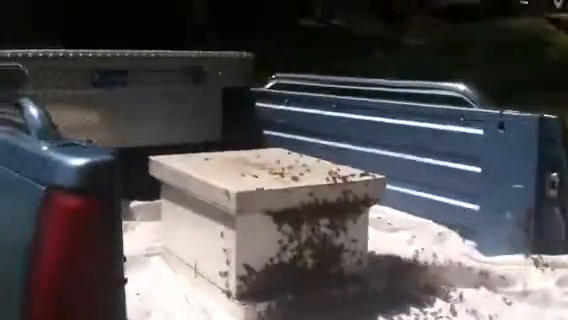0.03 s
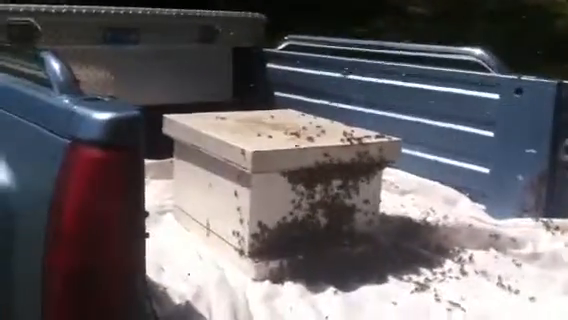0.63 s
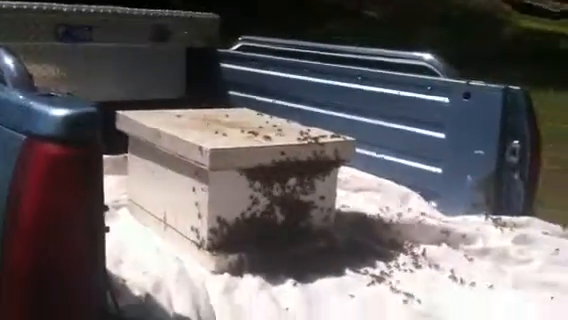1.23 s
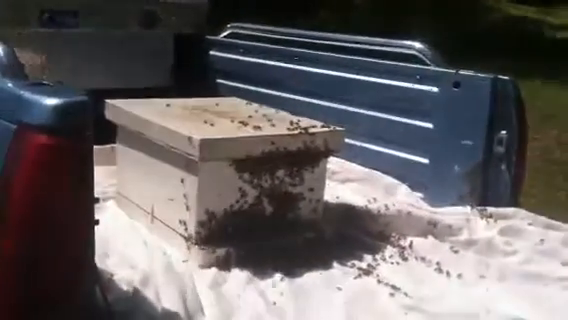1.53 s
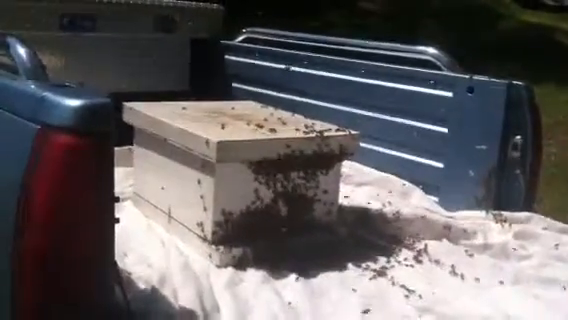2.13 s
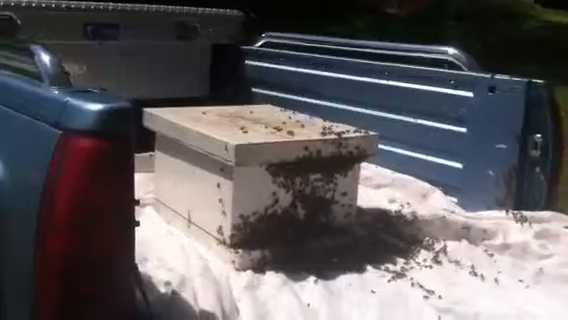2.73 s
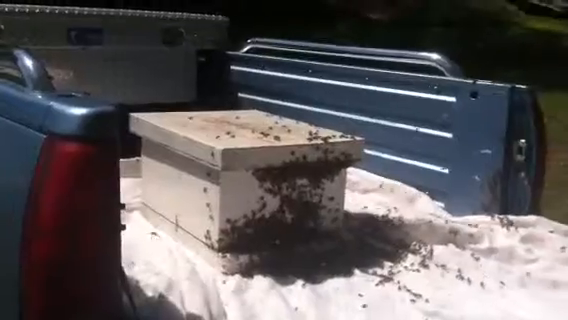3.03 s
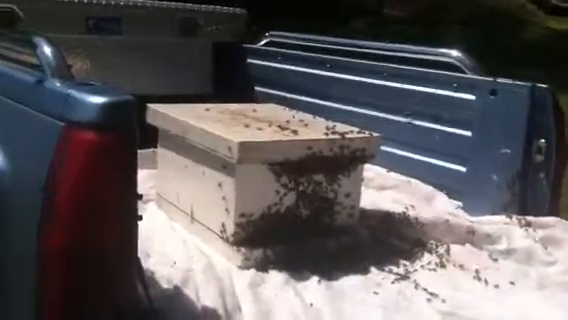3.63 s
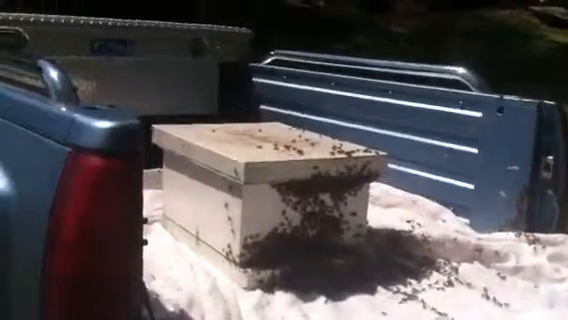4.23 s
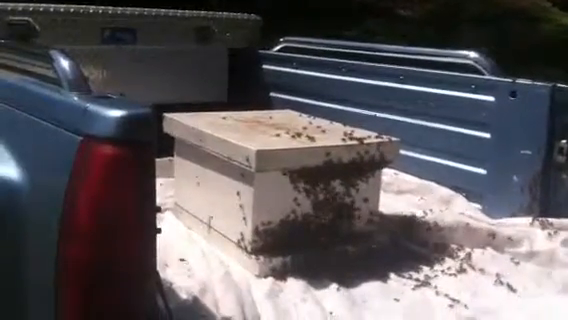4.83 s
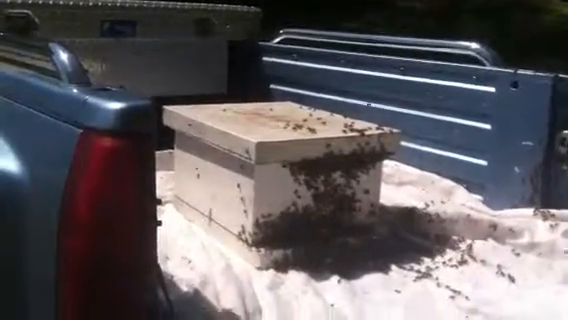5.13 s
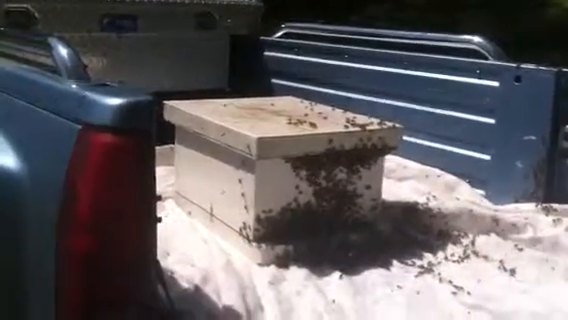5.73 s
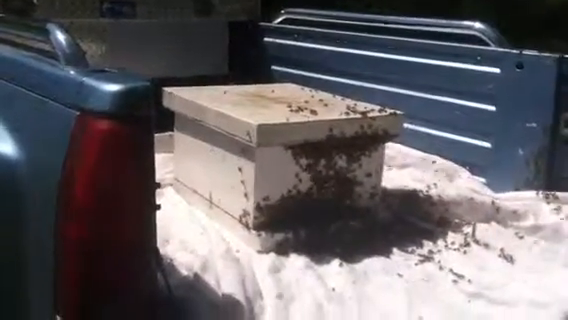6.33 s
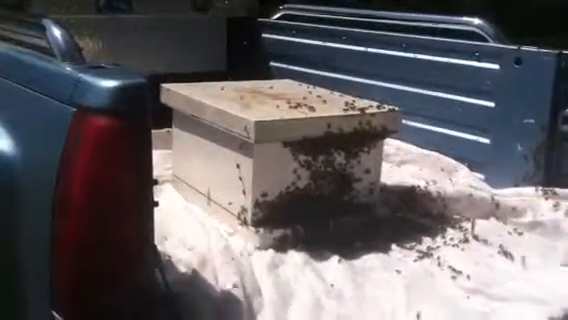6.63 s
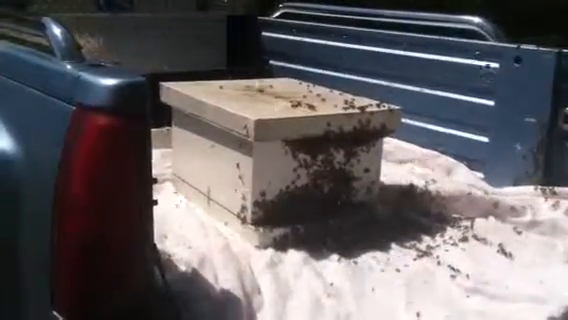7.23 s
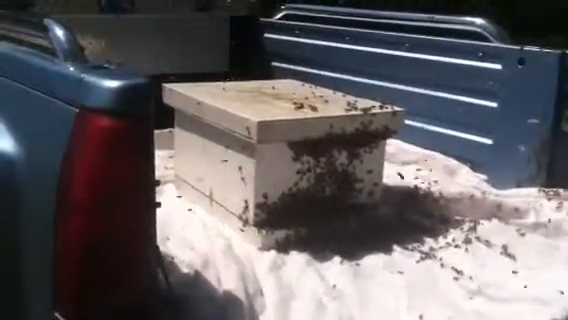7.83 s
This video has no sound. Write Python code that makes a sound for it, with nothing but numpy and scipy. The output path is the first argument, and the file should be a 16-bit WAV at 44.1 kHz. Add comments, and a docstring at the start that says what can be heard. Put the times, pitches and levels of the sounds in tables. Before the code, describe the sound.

Honeybees hum softly outdoors while fingers click and bump on the microphone, with a faint bird whistling far off.

```python
"""A swarm of honeybees settles on a hive box in the bed of a pickup, outdoors: many wingbeats merge
into one hum, and now and then a single bee passes close to the microphone.
Right at the microphone, fingers tap, bump and slide on the hand-held camera, most of all at the start.
Far off a bird repeats a falling whistle and others peep, over a low drone and soft open air."""
import sys
import numpy as np
from scipy import signal
from scipy.fft import rfft, irfft, next_fast_len
from scipy.io import wavfile
from scipy.ndimage import map_coordinates

SR = 44100
rng = np.random.default_rng(int(sys.argv[2]) if len(sys.argv) > 2 else 0)


def output_pcm(signal):
    """Save a mono or channel-first signal as 16-bit PCM at the path in sys.argv[1].

    Samples are clipped to [-1, 1] before scaling.
    """
    pcm = np.clip(np.atleast_2d(signal).T, -1, 1) * 32767
    wavfile.write(sys.argv[1], SR, np.round(pcm).astype(np.int16))


N = 357210
TIME_S = np.arange(N) / SR


def amp(db):
    """Decibels to gain."""
    return 10 ** (np.asarray(db) / 20)


def unit(x):
    """Scale to rms 1."""
    return x / np.sqrt(np.mean(x ** 2) + 1e-20)


def wobble(knots_per_s):
    """A smooth random curve, about 1 rms."""
    coarse = np.arange(0, N + 64, 64)
    knots = rng.standard_normal(int(N * knots_per_s / SR) + 4)
    return np.interp(np.arange(N), coarse, map_coordinates(knots, [coarse * knots_per_s / SR]))


def swell(t, middle_s, half_s):
    """A smooth bell of height 1."""
    return np.exp(-((t - middle_s) / half_s) ** 2)


def cycles(hz):
    """Cycles completed at a moving frequency."""
    return np.cumsum(hz) / SR


def filtered(x, gain_at_hz):
    """Filter x by a gain that depends on frequency."""
    size = next_fast_len(N + 8192)
    return irfft(rfft(x, size) * gain_at_hz(np.fft.rfftfreq(size, 1 / SR)), size)[:N]


def coloured(x, spectrum):
    """Shape x by (frequency_hz, level_db) points, at rms 1."""
    points_hz, db = np.transpose(spectrum)
    return unit(filtered(x, lambda hz: amp(np.interp(np.log(hz + 1), np.log(points_hz), db))))


def add(out, start_s, sound):
    """Mix a sound in at a time."""
    out[round(start_s * SR):][:len(sound)] += sound


# Open air and the microphone's own hiss: frequency_hz, level_db
AIR_SPECTRUM = [(25, -19), (70, -23), (125, 0), (155, 0), (210, 3.5), (600, -1.5), (1300, -1.5),
                (1700, -10.5), (3200, -18), (4400, -16), (5600, -23.5), (8000, -18), (10200, -26.5),
                (15500, -34.5)]

def open_air(level_db=-61):
    """Soft air and hiss all around, drifting slightly in level."""
    return amp(level_db + 0.6 * wobble(3.06)) * coloured(rng.standard_normal(N), AIR_SPECTRUM)


# Tones of a drone in the distance: pitch_hz, relative_db
DRONE_TONES = [(102, -5), (123, -5.5)]
# Its rise and fall: time_s, level_db
DRONE_LEVELS = [(0.7, -75), (4.7, -70), (5.67, -72.5), (7.42, -74.5), (8.1, -63)]

def far_drone():
    """Two low tones far off, each a little unsteady in level and pitch."""
    drone = np.zeros(N)
    for hz, db in DRONE_TONES:
        gain = amp(db + 1.8 * wobble(8.5))
        drone += gain * unit(np.sin(2 * np.pi * cycles(hz + 3.547 * wobble(13))))
    return drone * amp(np.interp(TIME_S, *np.transpose(DRONE_LEVELS)))


def whistle(t, hold_s, pitch_hz, attack_s=0.017, release_s=0.088):
    """One quavering note: it sags while held, then drops to a lower tone as it fades."""
    envelope = np.clip(np.minimum(t / attack_s, 1 - (t - hold_s) / release_s), 0, 1)
    sag_hz = 248 * t
    drop_hz = np.clip(8000 * (t - hold_s), 0, 221)
    quaver = 1 + 0.01 * wobble(140)[:len(t)]
    tremble = amp(2.5 * wobble(45)[:len(t)])
    return envelope * tremble * np.sin(2 * np.pi * cycles((pitch_hz - sag_hz - drop_hz) * quaver))


def through_trees(call, echo_db, t60_s=0.85):
    """A call reaches the microphone directly and as a fading wash of echoes from the trees."""
    t = TIME_S[:len(call)]
    paths = rng.standard_normal(len(t)) * amp(-60 * t / t60_s)
    paths *= amp(echo_db) / np.linalg.norm(paths)
    paths[0] += 1  # the direct path
    return signal.fftconvolve(call, paths / np.linalg.norm(paths))


# One bird whistling far off: start_s, hold_s, pitch_hz, level_db
WHISTLE_NOTES = [(1.44, 0.06, 2765, -68), (1.616, 0.078, 2763, -64), (1.836, 0.062, 2760, -64.5),
                 (2.038, 0.079, 2730, -64.5), (2.228, 0.097, 2725, -65.5), (2.434, 0.091, 2710, -66),
                 (5.105, 0.07, 2765, -66.5), (5.305, 0.075, 2755, -67), (5.502, 0.065, 2750, -67),
                 (5.73, 0.1, 2730, -65)]
# Thin peeps of other birds: middle_s, pitch_hz, level_db
BIRD_PEEPS = [(2.01, 3620, -76), (2.08, 3640, -77), (2.16, 3650, -78), (6.26, 4265, -76), (6.33, 4245, -75),
              (6.425, 4250, -75), (6.885, 3582, -77), (6.98, 3610, -78), (7.095, 3610, -74)]

def far_birds(peep_half_s=0.024):
    """Distant runs of whistles, blurred by the trees, and drier peeps."""
    t = TIME_S[:SR // 2]
    out = np.zeros(N + SR)
    notes = [(start_s, db, whistle(t, hold_s, hz)) for start_s, hold_s, hz, db in WHISTLE_NOTES]
    for start_s, db, note in notes:
        add(out, start_s, amp(db) * through_trees(note, echo_db=1.5))
    lead_s = 2 * peep_half_s
    for middle_s, hz, db in BIRD_PEEPS:
        peep = swell(t, lead_s, peep_half_s) * np.sin(2 * np.pi * hz * t)
        add(out, middle_s - lead_s, amp(db) * through_trees(peep, echo_db=-3))
    return out[:N]


# Skin rubbing on plastic: frequency_hz, level_db
SKIN_SPECTRUM = [(60, -38), (150, -5.5), (700, -5), (1200, -3.5), (1600, 1.5), (2400, -2), (4500, -8.5),
                 (5500, -12), (8500, -11.5), (11000, -21), (15500, -27)]
# Fingers shifting on the camera: middle_s, half_length_s, level_db, tilt_db_per_octave
FINGER_SLIDES = [(0.006, 0.015, -40, -5), (0.076, 0.018, -42.5, -5), (0.236, 0.068, -49.5, -4),
                 (0.38, 0.17, -56.5, -2.5), (.72, 0.71, -65.5, -2), (2.934, 0.22, -60.5, -2),
                 (3.36, 0.085, -59, -3), (3.826, 0.56, -65.5, -3.5)]

def finger_slides():
    """Skin rubs over the case in grainy swells, each with its own brightness."""
    out = np.zeros(N)
    for middle_s, half_s, db, tilt in FINGER_SLIDES:
        grain = rng.standard_normal(N) * amp(1.5 * wobble(250))
        rub = coloured(grain, [(hz, level + tilt * np.log2(hz)) for hz, level in SKIN_SPECTRUM])
        out += amp(db) * swell(TIME_S, middle_s, half_s) * rub
    return out


# A nail scraping on plastic: frequency_hz, level_db
NAIL_SPECTRUM = [(60, -18), (220, -2), (800, -0.5), (1100, -5), (1600, 5.5), (2200, -2), (2850, -10),
                 (3700, -5.5), (4200, -8.5), (4700, -6), (5500, -14.5), (7400, -11), (9500, -21),
                 (12000, -27.5), (15500, -37.5)]
# Quick scrapes right by the microphone: middle_s, half_length_s, level_db
NAIL_SCRAPES = [(0.481, 0.01, -41.5), (3.298, 0.032, -47.5)]

def nail_scrapes(slips_per_s=7000):
    """A nail skids over the case: tiny irregular slips excite its resonances."""
    out = np.zeros(N)
    for middle_s, half_s, db in NAIL_SCRAPES:
        slips = (rng.random(N) < slips_per_s / SR) * rng.standard_normal(N)
        out += amp(db) * swell(TIME_S, middle_s, half_s) * coloured(slips, NAIL_SPECTRUM)
    return out


# Resonances of the plastic case around the microphone: frequency_hz, width_hz, gain_db
CASE_MODES = [(483, 180, 3.5), (1090, 430, 1), (1974, 320, -9), (3180, 2700, -8)]

def knock(pitch_hz, q, low_cut_hz=95, size=2048):
    """A well damped blow that rings the case, as the small microphone hears it; peak 1."""
    f = np.fft.rfftfreq(size, 1 / SR)
    s, u = 1j * f / pitch_hz, 1j * f / low_cut_hz
    resonance = s / (1 + s / q + s * s)
    treble_cut = 1 / (1 + s / 1.28 + (s / 2.0) ** 2) / (1 + s / 2.2 + (s / 2.9) ** 2)
    case = 1 + sum(amp(db) * 1j * f * width / (hz * hz - f * f + 1j * f * width)
                   for hz, width, db in CASE_MODES)
    low_cut = (u * u / (1 + np.sqrt(2) * u + u * u)) ** 2
    ring = irfft(resonance * treble_cut * case * low_cut, size)[:size // 2]
    return ring / np.abs(ring).max()


# Fingertips landing on the camera: start_s, peak_db, pitch_hz
FINGER_BUMPS = [(0.0234, -19, 378), (0.0487, -23.5, 428), (0.067, -23.5, 362), (0.0853, -23, 255),
                (0.0888, -23, 234), (0.5816, -38.5, 150), (1.286, -39, 308), (1.4171, -35.5, 480),
                (1.4737, -39.5, 189), (2.1, -34, 240), (2.2929, -36, 278), (2.625, -40.5, 380),
                (2.6835, -29.5, 260), (3.282, -41, 240), (3.352, -44, 258), (4.577, -36.5, 290)]

def finger_bumps():
    """Flesh gives the case one round, dull push."""
    out = np.zeros(N + SR)
    for start_s, db, pitch_hz in FINGER_BUMPS:
        add(out, start_s, amp(db) * knock(pitch_hz, q=1.47))
    return out[:N]


# A nail tapping right by the microphone: start_s, level_db, pitch_hz, ring_q, jolt_relative_db
NAIL_CLICKS = [(0.0062, -27, 1500, 2, -20), (0.0092, -19.5, 2300, 0.96, -20), (0.0147, -9, 2900, 1.1, -25),
               (0.0144, -15, 10000, 1.7, -30), (0.0157, -18.5, 1200, 1.3, -20),
               (0.048, -16.5, 1190, 1.8, -13.5), (0.0675, -24.5, 1000, 0.89, -13),
               (0.0824, -34.5, 2400, 0.78, -12), (0.1103, -25, 1980, 3.0, -17),
               (0.152, -29.5, 1170, 1, -10.5), (0.188, -29.5, 1500, 0.86, -14),
               (0.207, -29.5, 1300, 1, -10), (0.579, -35, 1460, 1.5, -13), (0.5808, -26.5, 1580, 0.97, -12),
               (0.9609, -23, 1930, 1.3, -14), (0.9987, -37.5, 1600, 1.5, -15),
               (1.0018, -40, 1270, 1.8, -19.5), (1.04, -42, 8600, 0.95, -25), (1.0636, -43.5, 1600, 1, -10),
               (1.4169, -34, 2330, 3.9, -20), (2.6388, -35, 1500, 0.79, -12),
               (2.6847, -36.5, 1930, 0.71, -17.5), (2.6948, -42.5, 7640, 1, -25),
               (2.7053, -40, 7040, 1, -24.5), (3.3523, -42.5, 1700, 1.2, -16),
               (3.4137, -37.5, 1260, 0.89, -15), (3.4185, -38, 9000, 1, -19), (3.4232, -42, 4500, 1, -21.5),
               (4.2795, -52, 4200, 0.8, -25), (4.593, -49.5, 2900, 0.9, -20),
               (4.6203, -42, 7500, 0.72, -25)]

def nail_clicks(snap_db=-22, chatter_db=-11, chatter_t60_s=0.01):
    """Each click snaps, rings at its own pitch and jolts the camera, whose loose parts chatter."""
    out = np.zeros(N + SR)
    jolt, snap = knock(pitch_hz=253, q=0.78), knock(pitch_hz=8800, q=2.8)
    t = TIME_S[:len(jolt)]
    lowpass = signal.butter(1, 5000, fs=SR)
    for start_s, db, pitch_hz, q, jolt_db in NAIL_CLICKS:
        ring = knock(pitch_hz, q)
        rattle = signal.lfilter(*lowpass, rng.standard_normal(len(t)) * amp(-60 * t / chatter_t60_s))
        chatter = signal.fftconvolve(ring, rattle / np.linalg.norm(rattle))[:len(t)]
        click = ring + amp(snap_db) * snap + amp(chatter_db) * chatter + amp(jolt_db) * jolt
        add(out, start_s, amp(db) * click)
    return out[:N]


def bee(beat_hz, wander, flutter, swing_db, harmonics=30, size=2048):
    """One bee: a wing stroke rich in overtones repeats at a wandering rate, louder as it comes near."""
    stroke = irfft(np.r_[0, np.exp(2j * np.pi * rng.random(harmonics))], size)
    rate_hz = beat_hz * np.exp(wander * wobble(2.5) + flutter * wobble(16))
    wave = np.interp(cycles(rate_hz) % 1 * size, np.arange(size), stroke)
    return unit(wave) * amp(swing_db * np.tanh(wobble(2.948) / 2))


# Wingbeats at the microphone, for single bees and the swarm: frequency_hz, level_db
WING_SPECTRUM = [(110, -32), (170, -1), (245, 3), (300, 1.5), (380, 4), (510, -1.5), (600, -3), (820, -6),
                 (1000, -4), (1380, -5.5), (1550, -17.5), (2600, -14.5), (3200, -31.5), (8000, -22.5)]
# Single bees close to the microphone: middle_s, half_length_s, wingbeat_hz, level_db
BEE_FLYBYS = [(1.64, 0.14, 250.4, -63), (4.33, 0.1, 229, -65), (5.14, 0.11, 212.3, -67),
              (6.2, 0.05, 249.7, -64), (6.47, 0.08, 245.6, -64), (7.15, 0.14, 229.6, -66),
              (7.8, 0.11, 252, -64)]

def near_bees():
    """One bee stands out of the hum for a moment, rounder in tone than the swarm."""
    out = np.zeros(N)
    darker = [(hz, level - 3 * np.log2(hz)) for hz, level in WING_SPECTRUM]
    for middle_s, half_s, beat_hz, db in BEE_FLYBYS:
        wings = coloured(bee(beat_hz, wander=.04, flutter=.016, swing_db=1), darker)
        out += amp(db) * swell(TIME_S, middle_s, half_s) * wings
    return out


# The swarm swells as bees pass close: middle_s, half_length_s, gain_db
SWARM_SWELLS = [(1.623, 0.28, 2.2), (7.3, 0.92, 3)]

def swarm(bees_per_group=17, hum_db=-61, buzz_db=-63, drift_db=2):
    """Flying bees beat fast, those fanning on the box slower; their overtones blur into a buzz."""
    flying = sum(bee(hz, wander=.032, flutter=.009, swing_db=7.5)
                 for hz in np.linspace(232, 262, bees_per_group))
    fanning = sum(bee(hz, wander=.04, flutter=.011, swing_db=6.5)
                  for hz in np.linspace(163, 222, bees_per_group))
    wings = coloured(flying + amp(1.0) * fanning, WING_SPECTRUM)
    hum = filtered(wings, lambda hz: 1 / (1 + (hz / 580) ** 8))
    buzz = wings - hum
    passing_db = sum(db * swell(TIME_S, middle_s, half_s) for middle_s, half_s, db in SWARM_SWELLS)
    gain = amp(drift_db * wobble(1.19) + passing_db)
    return gain * (amp(hum_db) * unit(hum) + amp(buzz_db) * unit(buzz))


def scene():
    """Beside the pickup, in mono: bees nearby, birds and drone far off, a hand on the camera."""
    bees = swarm() + near_bees()
    background = open_air() + far_drone() + far_birds()
    handling = nail_clicks() + finger_bumps() + finger_slides() + nail_scrapes()
    return (bees + background + handling)[None]


def record(dry):
    """The hand-held camera keeps nothing above its band limit."""
    top_hz, edge_hz = 15750, 400
    return filtered(dry[0], lambda hz: np.clip((top_hz - hz) / edge_hz + .5, 0, 1))[None]


dry = scene()
out = record(dry)
output_pcm(out)
```